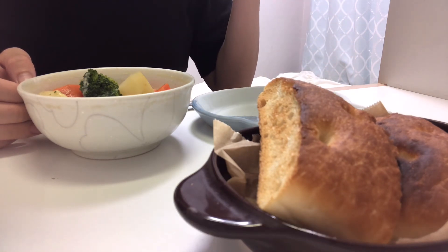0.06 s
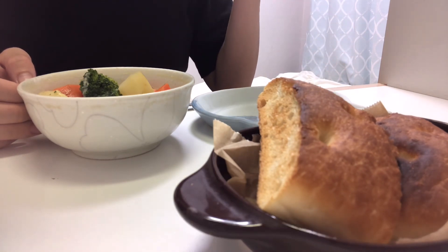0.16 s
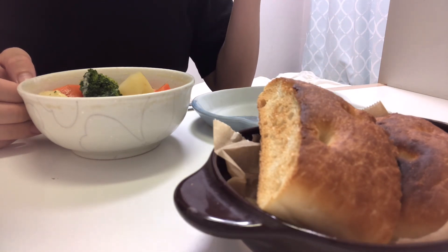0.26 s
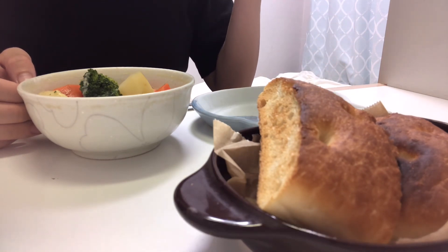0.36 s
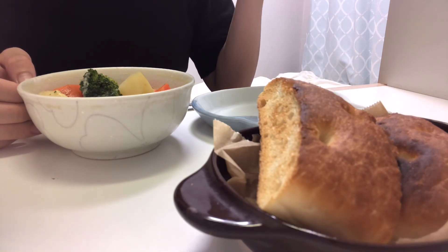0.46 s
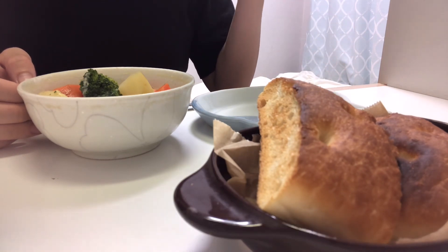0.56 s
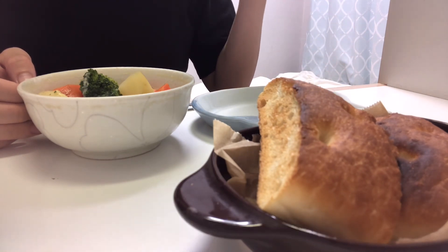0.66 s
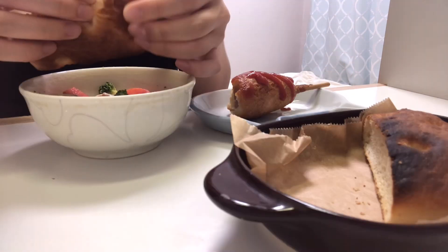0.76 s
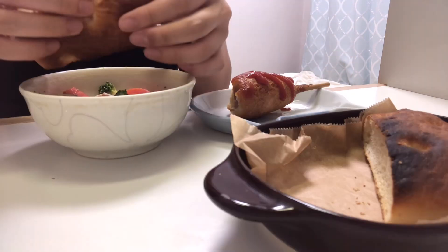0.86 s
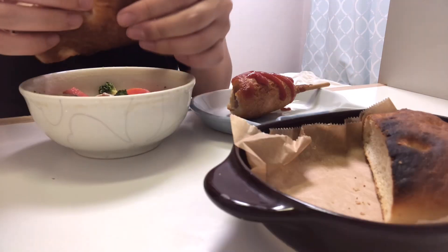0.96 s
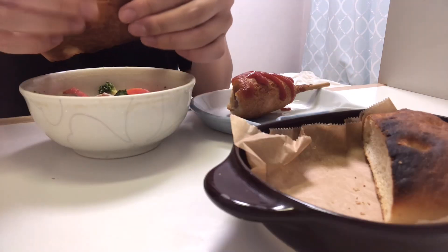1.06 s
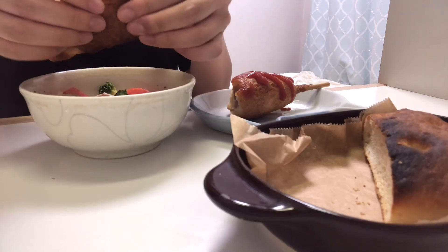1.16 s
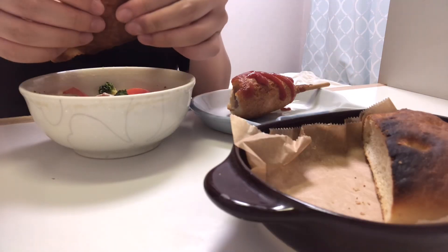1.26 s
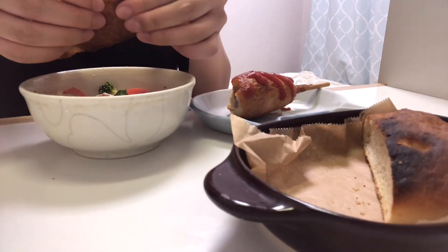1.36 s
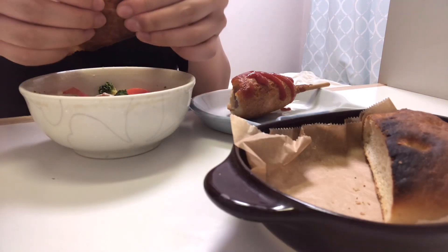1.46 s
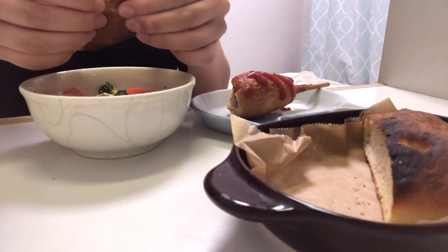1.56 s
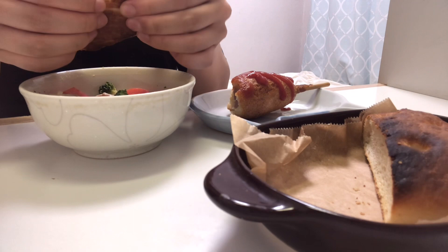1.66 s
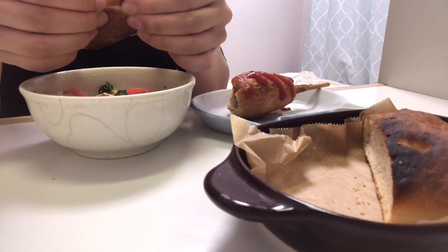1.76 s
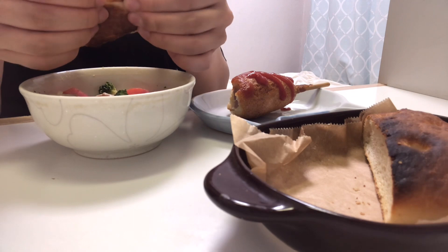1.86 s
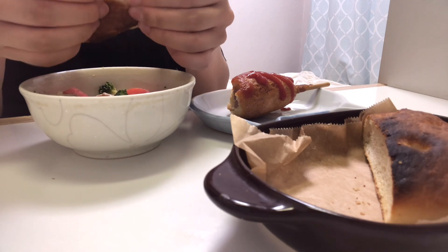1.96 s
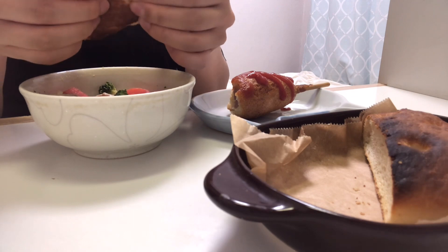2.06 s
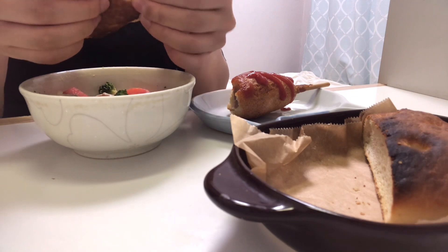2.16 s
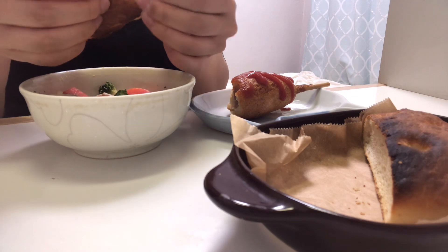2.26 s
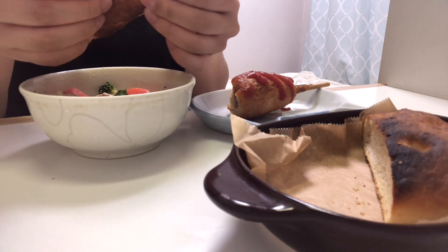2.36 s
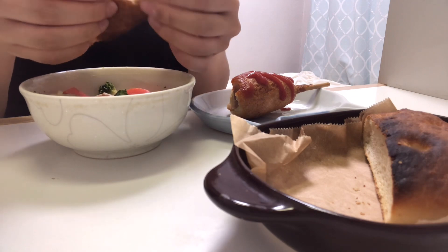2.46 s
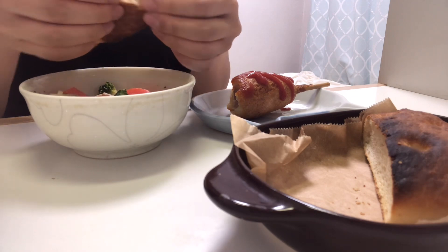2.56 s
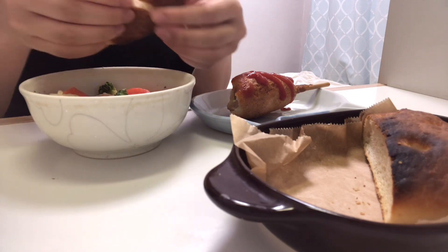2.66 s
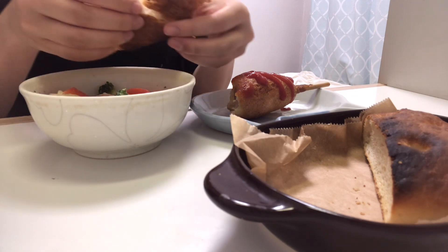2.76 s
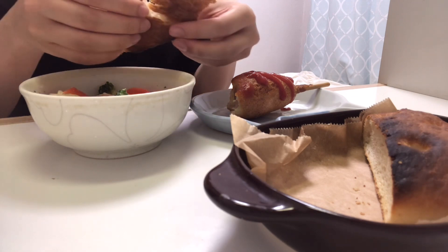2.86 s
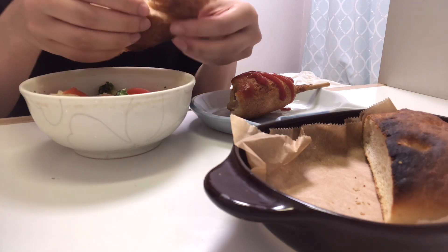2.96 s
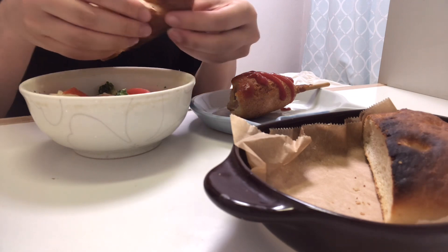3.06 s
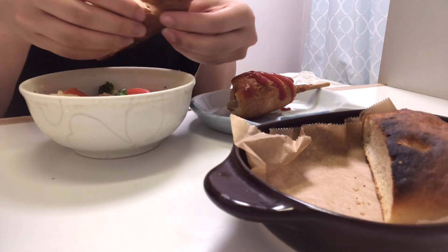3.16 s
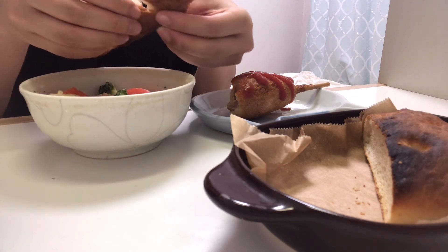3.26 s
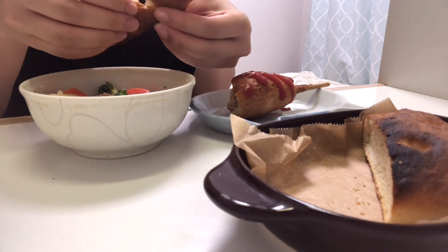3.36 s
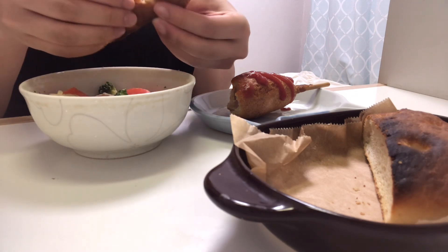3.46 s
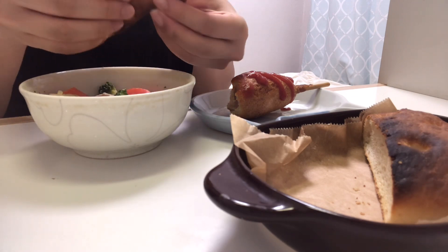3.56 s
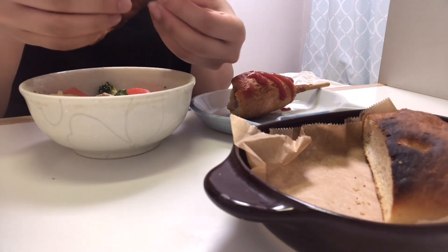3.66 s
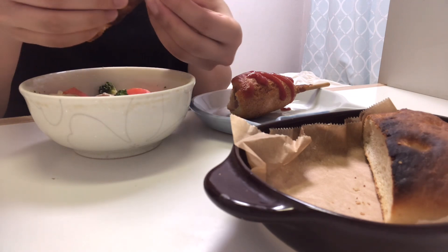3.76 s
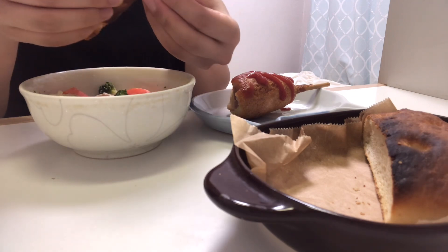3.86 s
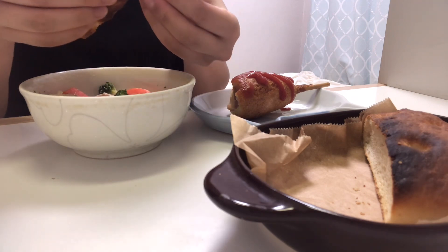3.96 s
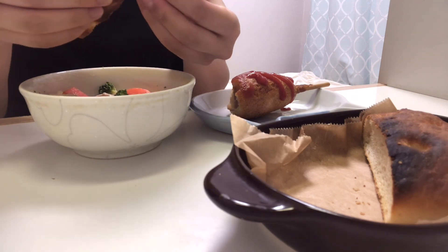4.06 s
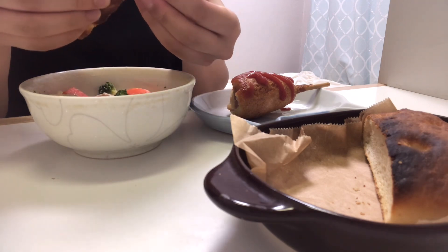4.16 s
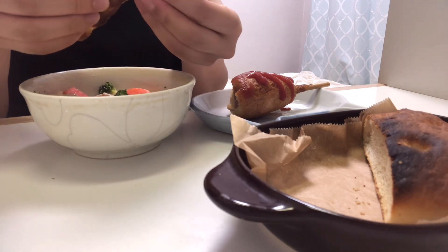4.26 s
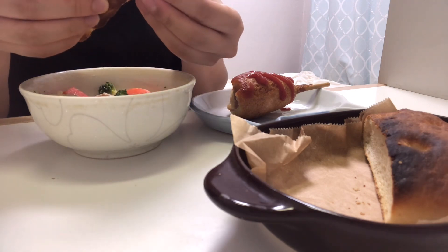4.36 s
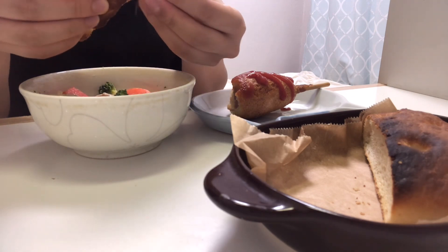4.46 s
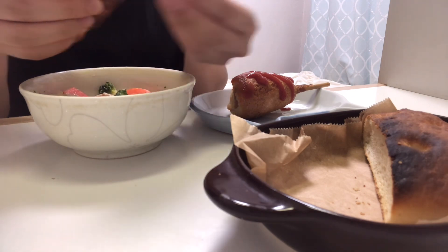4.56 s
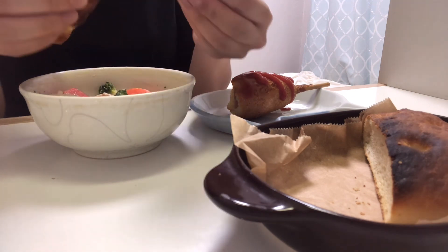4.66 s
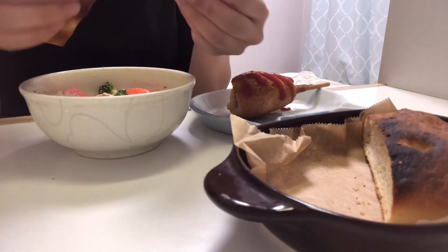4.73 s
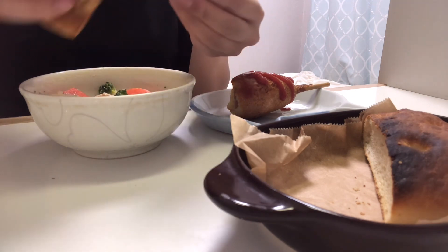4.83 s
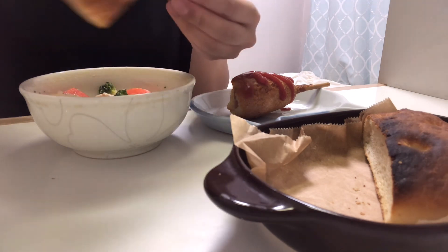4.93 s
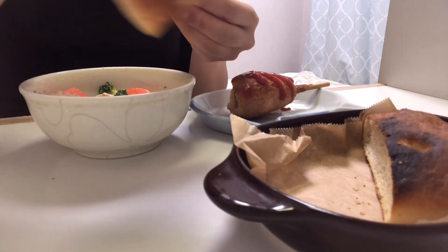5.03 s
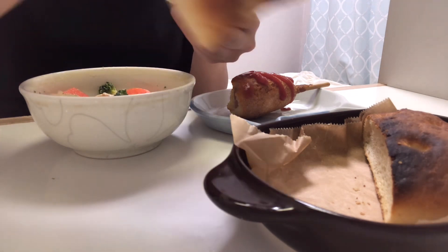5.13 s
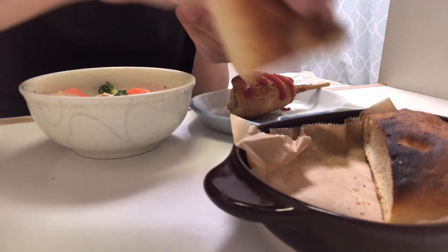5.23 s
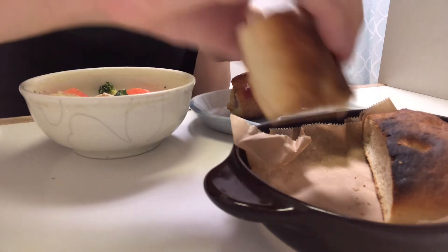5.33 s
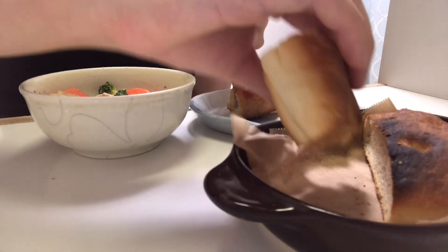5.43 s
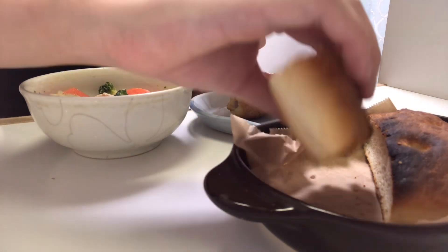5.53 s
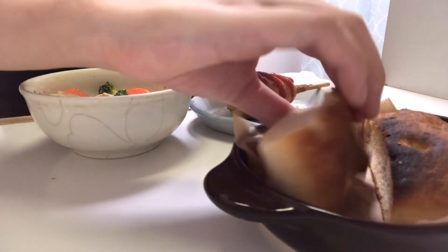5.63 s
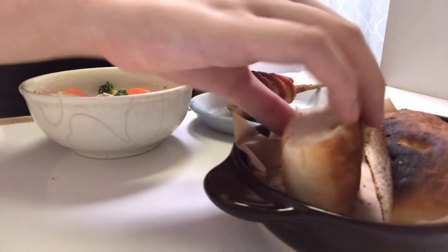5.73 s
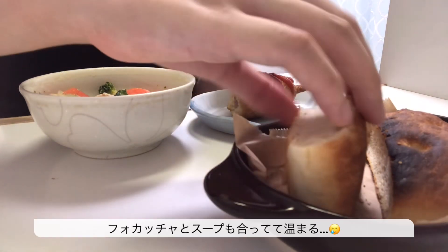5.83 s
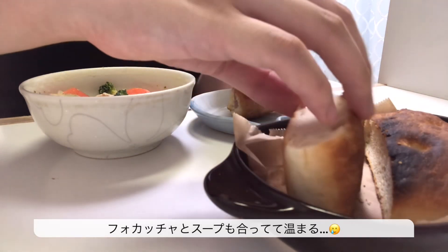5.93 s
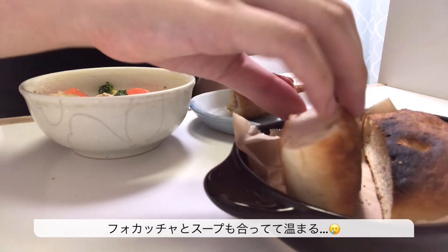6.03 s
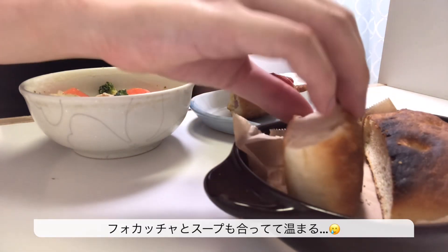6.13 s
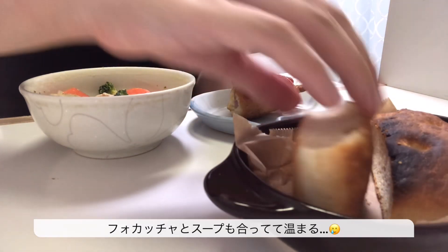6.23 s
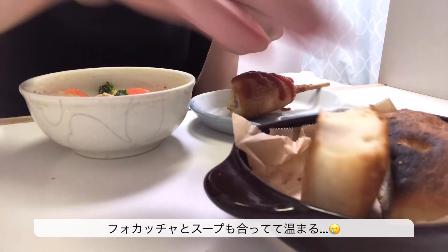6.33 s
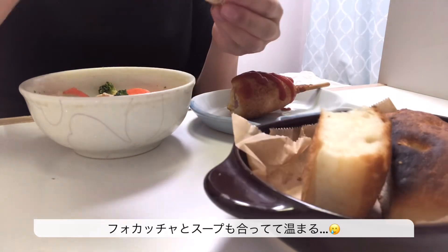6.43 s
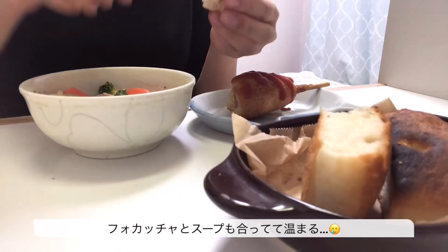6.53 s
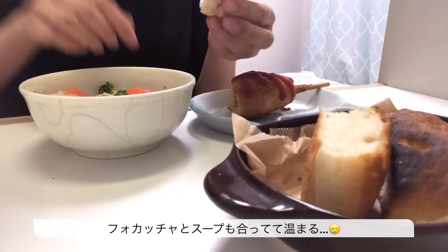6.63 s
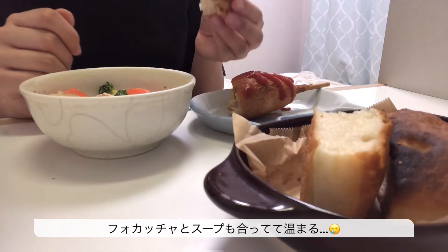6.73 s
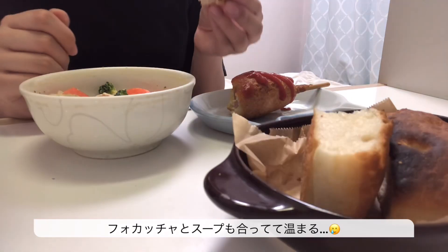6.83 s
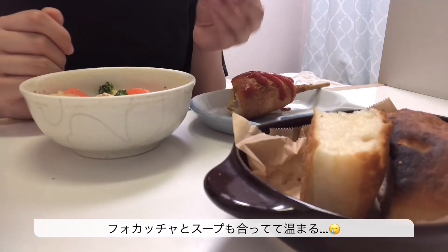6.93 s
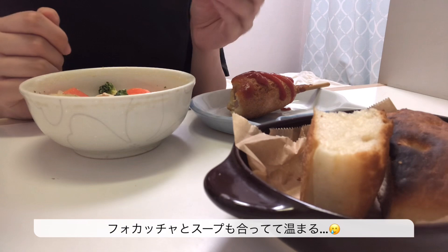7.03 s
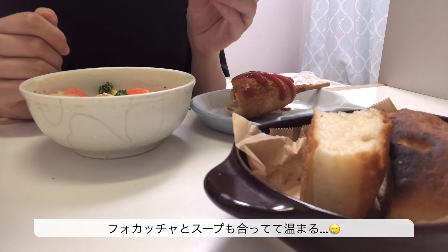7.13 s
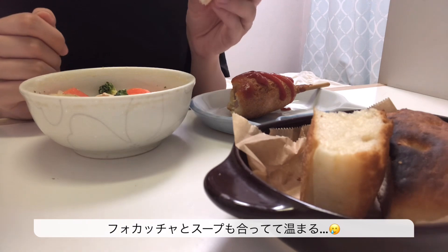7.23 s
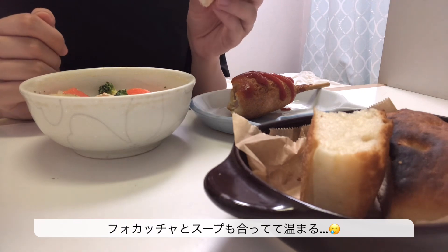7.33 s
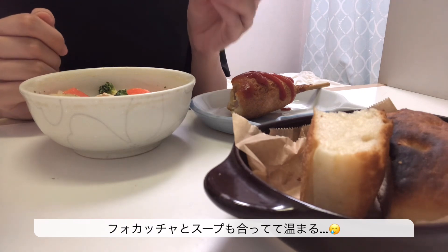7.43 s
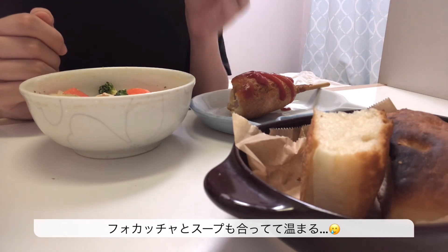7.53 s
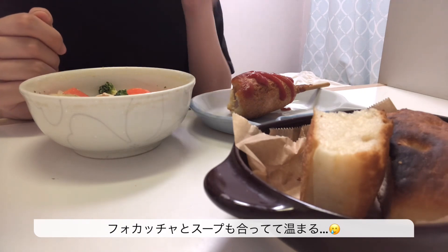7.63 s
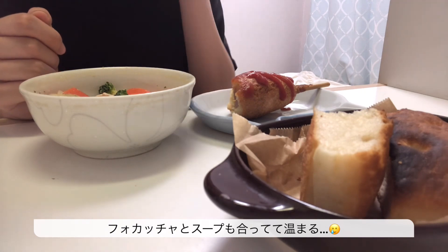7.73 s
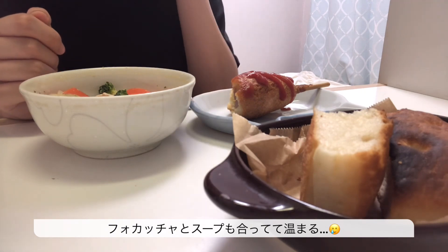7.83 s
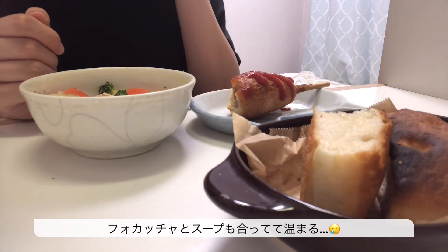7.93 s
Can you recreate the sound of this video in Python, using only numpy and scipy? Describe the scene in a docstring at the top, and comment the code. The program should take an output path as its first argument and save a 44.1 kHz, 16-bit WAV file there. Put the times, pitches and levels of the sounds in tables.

```python
"""Hands tear a crusty piece of bread at a table: volleys of clicks for the cracks, fine crackle for the crumb.
It is set back in a dish lined with baking paper: the paper snaps and rustles, and each sound of it rings
the ceramic. The bread knocks loudly once on the dish: a soft push rings the modes of dish and table.
Filtered noise and a wandering tone give the room's hiss and low hum, louder for the first moments."""
import sys
import numpy as np
from scipy import signal
from scipy.io import wavfile
from scipy.ndimage import uniform_filter1d

SR = 44100
rng = np.random.default_rng(int(sys.argv[2]) if len(sys.argv) > 2 else 0)


def transcribe(u):
    """Save the signal u as a 16-bit wav file named by the first command-line argument.

    u: samples, shape (n,) or (channels, n), limited to [-1, 1]; the rate is SR.
    q: integer samples, one column per channel.
    """
    v = np.clip(np.atleast_2d(u).T, -1, 1)
    q = np.round(v * 32767).astype(np.int16)
    wavfile.write(sys.argv[1], SR, q)


N = 352259

# Treble of the breaks over time. Each row: time in seconds, part over 8 kHz in dB.
TREBLE = [(1.1, -12), (1.6, -13), (3.4, -17.5), (4.5, -15.5), (5.3, -13.5), (8, -15)]


def gain_of(db):
    """Amplitude factor of a dB value."""
    return 10 ** (np.asarray(db) / 20)


def evened(x):
    """Scale to an RMS of 1."""
    return x / np.sqrt(np.mean(x ** 2) + 1e-20)


def smoothed(x, *sizes):
    """Successive moving averages, sizes in samples."""
    for size in sizes:
        x = uniform_filter1d(x, size=size)
    return x


def read(points, hz):
    """Interpolate a spectrum in dB along log frequency."""
    f, value = np.transpose(points)
    return np.interp(np.log(hz + 1), np.log(f + 1), value)


def curve(points):
    """Interpolate (seconds, value) rows over every sample of the scene."""
    return np.interp(np.arange(N) / SR, *np.transpose(points))


def add(mix, s, sound):
    """Mix a sound in at s seconds, cut at the end."""
    part = mix[round(s * SR):][:len(sound)]
    part += sound[:len(part)]


def causal(db):
    """Minimum-phase impulse response for a dB spectrum given from 0 to SR / 2."""
    both_sides_db = np.r_[db, db[-2:0:-1]]
    log_gain = np.log(gain_of(np.maximum(both_sides_db, -100)))
    return np.fft.ifft(np.exp(np.conj(signal.hilbert(log_gain)))).real


def swell_level(swells, shape=1.32, rise_share=0.47):
    """Each swell rises to its peak and falls away a little more slowly; their powers add."""
    power = np.zeros(N)
    t = np.arange(-SR // 4, SR // 4) / SR
    share = np.where(t < 0, rise_share, 1 - rise_share)
    for s, db, ms in swells:
        u = abs(t) * 1000 / (ms * share)  # 1 where the swell is 6 dB down
        add(power, s + t[0], gain_of(db - 6 * u ** shape) ** 2)
    return np.sqrt(power)


def hum():
    """A low tone that comes and goes; its pitch wanders by a few per cent."""
    # Each row: time in seconds, RMS level in dB before the room's level curve.
    hum_levels = [(0, -67), (1.1, -72), (1.6, -59.5), (3, -70), (4.8, -60.5), (5.299, -65), (8, -71.5)]
    centre_hz = 58.2
    wander = evened(smoothed(rng.standard_normal(N), 9000, 9000))
    turns = np.cumsum(centre_hz * (1 + 0.016 * wander)) / SR
    return gain_of(curve(hum_levels)) * evened(np.sin(2 * np.pi * turns))


def whines():
    """Narrow hisses: noise through two-pole resonators."""
    # Each row: centre in Hz, width in Hz, RMS level in dB before the room's level curve.
    narrow_hisses = [(83.9, 8.1, -73), (119.7, 3.6, -66), (2587, 180, -83.5), (4960, 90, -88)]
    out = np.zeros(N)
    for hz, width_hz, db in narrow_hisses:
        r = np.exp(-np.pi * width_hz / SR)
        poles = [1, -2 * r * np.cos(2 * np.pi * hz / SR), r * r]
        out += gain_of(db) * evened(signal.lfilter([1], poles, rng.standard_normal(N)))
    return out


def room_tone():
    """Random short-time spectra, wavering in patches mostly in the lows, with whines and hum."""
    # Noise spectrum. Each row: frequency in Hz, relative level in dB per Hz.
    room_spectrum = [(28, -26.5), (45, -12), (65, -5.5), (115, -6.5), (146, -15.5), (197, -7.5),
                     (238, -18.5), (370, -15), (600, -20.5), (760, -24), (1600, -30.5), (7500, -36),
                     (8500, -39), (15500, -44)]
    # Level curve of the whole room tone. Each row: time in seconds, gain in dB.
    lift = [(0, 8), (.77, 8), (.81, 2.5), (1.5, 2), (8, 1.96)]
    noise_db = -61  # RMS before lift
    frames, hz = N // 512 + 5, np.fft.rfftfreq(2048, 1 / SR)
    real, imag, patches = rng.standard_normal((frames, len(hz), 3)).T
    patches = uniform_filter1d(patches, size=3, axis=0)
    patches = evened(uniform_filter1d(patches, size=6, axis=1))
    waver_db = read([(60, 2.8), (300, 2.5), (1500, 0.26)], hz)[:, None] * patches
    spectra = (real + 1j * imag) * gain_of(read(room_spectrum, hz)[:, None] + waver_db)
    noise = signal.istft(spectra, nperseg=2048, noverlap=1536)[1][:N]
    return (gain_of(noise_db) * evened(noise) + whines() + hum()) * gain_of(curve(lift))


def echoes(x, t60, start_ms, count=4):
    """Sparse taps of random sign from table, bowls and walls, dying fast; a pattern is drawn every 30 ms."""
    t, out = np.arange(SR // 4) / SR, np.zeros(N)
    place = np.repeat(rng.integers(0, count, N // 1323 + 1), 1323)[:N]  # which of the patterns
    for k in range(count):
        taps = np.zeros(len(t))
        at = np.arange(0, len(t) - 20, 20) + rng.integers(0, 20, (len(t) - 1) // 20)
        taps[at] = rng.choice([-1., 1.], len(at))
        taps *= gain_of(-60 * t / t60) * (1 - np.exp(-t * 1000 / start_ms))
        out += signal.oaconvolve(x * (place == k), taps / np.linalg.norm(taps))[:N]
    return out


def table_ring():
    """Decaying modes of dish and table top; close pairs starting in opposite directions swell and beat."""
    # Each row: frequency in Hz, relative level in dB, t60 in seconds, starting direction +-1.
    modes = [(62, -35, .44, -1), (74, -33, .34, 1), (173, -12, .076, -1), (205, .1, .063, 1),
             (214, -6, .072, -1), (272, -7, .04, -1), (334, -15, .035, 1), (460, -19, .04, -1),
             (615, -27, .1, 1)]
    t = np.arange(SR // 2) / SR
    return sum(way * gain_of(db - 60 * t / t60) * np.sin(2 * np.pi * hz * t) for hz, db, t60, way in modes)


def thumps(ring):
    """Hands on the table and bread on the dish: a soft push of up to a few ms rings the modes."""
    # Each row: start in seconds, peak level in dB, contact in ms.
    blows = [(2.48, -51, 1.2), (4.997, -50.5, .6), (5.399, -48.5, 0.73), (5.578, -42, 1.3),
             (5.601, -32, .6), (5.6105, -4, 1.97), (6.099, -43, 1.4), (6.138, -34.5, 5.7),
             (6.301, -33, 2.4), (6.503, -47, 0.95)]
    out, t = np.zeros(N), np.arange(900) / SR
    for s, db, ms in blows:
        push = np.sin(np.pi * np.minimum(t * 1000 / ms, 1)) ** 2
        sound = np.convolve(ring, push)
        add(out, s, gain_of(db) * sound / abs(sound).max())
    return out


def drags(ring):
    """Bread dragging in the dish: swelling noise shakes the same modes at random."""
    # Each row: peak time in seconds, level in dB, ms spent within 6 dB of the peak.
    drag_swells = [(5.69, -45, 64), (5.953, -51.5, 103), (6.167, -47, 54), (6.273, -47, 112)]
    shaking = swell_level(drag_swells) * rng.standard_normal(N)
    return signal.oaconvolve(shaking, ring / np.linalg.norm(ring))[:N]


def snaps(table, ms, lumpy_db, spiky_db, lead):
    """Each snap is a short volley of uneven clicks; it peaks at lead * ms, then dies by 1/e per ms setting."""
    treble_per_body = -0.29  # dB per dB: breaks with less body have more treble
    out, size, early = np.zeros(N), 2048, 600
    t, hz = (np.arange(size) - early) / SR, np.fft.rfftfreq(512, 1 / SR)
    u = t * 1000 / ms
    envelope = np.exp(-np.maximum(u - lead, 1 - u / lead))
    draws = rng.standard_normal((len(table), 3, size))
    for (s, db, low_db), (clicks, spikes, lumps) in zip(table, draws):
        volley = clicks * gain_of(spiky_db * spikes) * envelope
        high_db = np.interp(s, *np.transpose(TREBLE)) + treble_per_body * low_db
        colour = read([(300, low_db - 14), (1100, low_db - 6.0), (2200, low_db - 3),
                       (5000, -1.1), (11500, high_db + 4.5), (16000, high_db - 0.5)], hz)
        # random uneven colour, new for each snap
        colour = colour + lumpy_db * evened(smoothed(lumps[:len(hz)], 6))
        sound = np.convolve(volley, causal(colour)[:256])
        loudest = np.sqrt(smoothed(sound ** 2, 160).max())  # RMS of the loudest 3.6 ms
        add(out, s - early / SR, gain_of(db) * sound / loudest)
    return out


def crackle(swells, spectrum, per_s, spread_db, clump_db, lumpy_db):
    """Tiny breaks at random moments, in clumps, a few of them large; each takes one of twelve random colours."""
    clumps = evened(smoothed(rng.standard_normal(N), 100, 60))
    spread = np.minimum(rng.exponential(1, N), 3.5)
    size = gain_of(spread_db * spread + clump_db * clumps)
    size *= (rng.random(N) < per_s / SR) * rng.choice([-1, 1], N)
    size = evened(size) * swell_level(swells)
    which, hz, out = rng.integers(0, 12, N), np.fft.rfftfreq(512, 1 / SR), np.zeros(N)
    for k, lumps in enumerate(rng.standard_normal((12, len(hz)))):
        colour = read(spectrum, hz) + lumpy_db * evened(smoothed(lumps, 5))
        tap = causal(colour)[:256]
        out += signal.oaconvolve(size * (which == k), tap / np.linalg.norm(tap))[:N]
    return out


def squeak():
    """A thin tone of some 25 ms as the hand lets go. Returns its start in seconds and its sound."""
    # Start in seconds, frequency in Hz, peak level in dB.
    s, hz, db = (5.7, 5800, -62)
    t = np.arange(1100) / SR
    return s, gain_of(db) * np.sin(np.pi * t / t[-1]) ** .5 * np.sin(2 * np.pi * hz * t)


def dish_ring(x):
    """The paper lies in the dish, so each of its snaps rings the ceramic."""
    # Each row: frequency in Hz, relative level in dB, t60 in seconds.
    glaze = [(1646, -2, .035), (2430, -3, .03), (4500, -2, .02), (7800, 1, .01)]
    t = np.arange(SR // 10) / SR
    ring = sum(gain_of(db - 60 * t / t60) * np.sin(2 * np.pi * hz * t) for hz, db, t60 in glaze)
    return signal.oaconvolve(x, ring / np.linalg.norm(ring))[:N]


def baking_paper():
    """Paper buckles in separate snaps and rustles finely at each touch; the dish rings along."""
    # Separate snaps, loud and faint. Each row: start in seconds, peak level in dB, part under 3 kHz in dB.
    buckles = [(5.3683, -41.5, -7), (5.4009, -31, -2.5), (5.4188, -46, 11), (5.4336, -46, 4),
               (5.462, -37, -12), (5.498, -51.5, -24), (5.536, -52, 5), (5.569, -44.5, 10),
               (5.6058, -18, -5.5), (5.6184, -24, -44), (5.7002, -29.5, -11), (5.7197, -26.5, -4.5),
               (5.9232, -38.5, -17), (5.9819, -40, 3), (6.038, -41, -3.5), (6.095, -44.5, -11),
               (6.1383, -39.5, -12), (6.1868, -47, 6), (6.2046, -41, 12), (6.2434, -36, -11),
               (6.3002, -50.5, -18), (6.3607, -45.5, -8.5), (6.4971, -49.5, -1)]
    # Rustle. Each row: peak time in seconds, level in dB, ms spent within 6 dB of the peak.
    touches = [(5.372, -43, 11.5), (5.415, -45.5, 25), (5.562, -56.5, 41), (5.607, -28, 7.5),
               (5.678, -41, 61), (5.737, -48.5, 26), (5.928, -44.5, 34), (6.038, -45.5, 10),
               (6.152, -56.5, 35), (6.21, -61, 29), (6.262, -47, 38), (6.375, -58.5, 28)]
    # Rustle spectrum. Each row: frequency in Hz, relative level in dB per Hz.
    rustle_spectrum = [(250, -10), (500, -3), (900, -8), (1650, -3), (2500, -3.5), (5000, -2.5), (8000, -9),
                       (15500, -11)]
    paper = snaps(buckles, ms=2.6, lumpy_db=2.5, spiky_db=2, lead=0.1)
    paper += crackle(touches, rustle_spectrum, per_s=8000, spread_db=1.0, clump_db=4.0, lumpy_db=4.0)
    add(paper, *squeak())
    return paper + gain_of(-11.0) * dish_ring(paper)


def dulled(x, full_db, share):
    """The part over 8 kHz follows a share of the treble curve, unchanged where that equals full_db."""
    low = signal.oaconvolve(x, signal.firwin(31, 8000, fs=SR), "same")
    return low + (x - low) * gain_of(share * (curve(TREBLE) - full_db))


def torn_bread():
    """Crust breaks in separate cracks; the crumb crackles finely in one swell a pull."""
    # Separate cracks, loud and faint. Each row: start in seconds, peak level in dB, part under 3 kHz in dB.
    cracks = [(1.0534, -52, -15), (1.1197, -43.5, -6), (1.1832, -42.5, -2), (1.2703, -50, -8),
              (1.3156, -39.5, -5), (1.332, -48, -1), (1.3766, -56, -12), (1.402, -48.5, -40),
              (1.4643, -39.5, -3.5), (1.481, -44.5, -4), (1.503, -45.5, -3), (1.5542, -49.5, -12),
              (1.638, -44.5, -2), (1.648, -49.5, -16), (1.670, -56, -15), (1.6914, -58, -12),
              (1.711, -47.5, -5), (1.747, -50.5, -1), (1.766, -51, -6), (1.918, -53.5, -21),
              (1.9533, -67, -10), (1.9766, -42.5, -2), (2.006, -45.5, 3), (2.0349, -52, 6),
              (2.0915, -54, -10), (2.1277, -44.5, -1.5), (2.1908, -52, -18), (2.2189, -45, -9),
              (2.2527, -49, -2), (2.2897, -46.5, -17), (2.4075, -50.5, 3), (2.4714, -50.5, -10),
              (2.548, -54, -26), (2.86, -58.5, -10), (2.9316, -58, -1), (3.017, -44.5, -11.5),
              (3.1466, -56.5, -19), (3.2211, -54.5, -22), (3.269, -43.5, 0), (3.3104, -57.5, -8),
              (3.3696, -55.5, -19), (3.4295, -55.5, -16), (3.4688, -41, 3), (3.4816, -44.5, 10),
              (3.5004, -37.5, -9), (3.5752, -43, -10), (3.5977, -48.5, -18), (3.632, -56, -5),
              (3.662, -52, -12), (3.6929, -45, -13), (3.7273, -53.5, -17), (3.822, -55, -6),
              (3.8377, -45.5, -6), (3.8905, -52, 3), (3.9503, -59, -4), (3.9787, -49.5, -8),
              (4.0293, -43, -11.5), (4.1768, -62, -12), (4.2412, -52.5, -6), (4.2752, -52, -12),
              (4.3624, -61, -19), (4.4023, -59, -3), (4.4398, -51, -2), (4.466, -48, -6),
              (4.5294, -41.5, -5), (5.0806, -54.5, 10), (7.64, -56, -45)]
    # Crackle. Each row: peak time in seconds, level in dB before dulling, ms spent within 6 dB of the peak.
    pulls = [(.42, -60, 103), (1.075, -54, 41), (1.135, -50, 23), (1.19, -42, 36), (1.305, -54.5, 109),
             (1.485, -51.5, 95), (1.56, -60, 56), (1.68, -57.5, 51), (1.77, -55.5, 78), (2.0, -55.5, 113),
             (2.132, -47, 21.5), (2.245, -46, 61), (2.94, -70.5, 125), (3.018, -47.5, 19.5),
             (3.16, -63, 77), (3.41, -61.5, 115), (3.495, -51.5, 89), (3.62, -58, 166), (3.77, -68, 60),
             (3.86, -59, 91), (3.973, -56.5, 44), (4.2, -71, 98), (4.49, -51.5, 41), (4.55, -47.5, 20),
             (5.03, -64.5, 56)]
    # Crackle spectrum before dulling. Each row: frequency in Hz, relative level in dB per Hz.
    crumb_spectrum = [(500, -67), (1000, -9), (1400, -6.5), (2660, -6), (4500, -4.5), (9000, -3),
                      (15500, -3.5)]
    crust = snaps(cracks, ms=0.86, lumpy_db=2.0, spiky_db=2.5, lead=1.17)
    crumb = crackle(pulls, crumb_spectrum, per_s=2200, spread_db=5.5, clump_db=3.5, lumpy_db=0.5)
    return crust + dulled(crumb, full_db=-7, share=.6)


def scene():
    """Sum of room, table, paper and bread, with echoes of the last two."""
    ring = table_ring()
    paper, bread = baking_paper(), torn_bread()
    wet = gain_of(-9.5) * echoes(paper, t60=0.086, start_ms=3.1)
    wet += gain_of(-6.0) * echoes(bread, t60=0.067, start_ms=1.0)
    return (room_tone() + thumps(ring) + drags(ring) + paper + bread + wet)[None]


def record(dry):
    """The microphone drops the deepest bass; then the band limit of the recorder."""
    edge_hz = 15750
    thin = signal.sosfilt(signal.butter(2, 42, "high", fs=SR, output="sos"), dry)
    band = signal.firwin(511, edge_hz, window=("kaiser", 9), fs=SR)
    return signal.oaconvolve(thin, band[None], "same")


dry = scene()
out = record(dry)
transcribe(out)
```